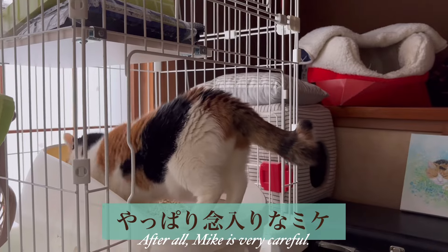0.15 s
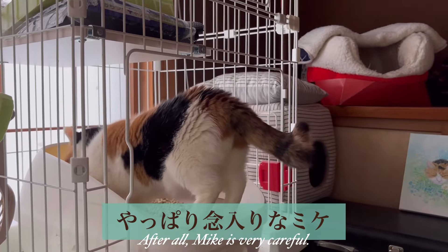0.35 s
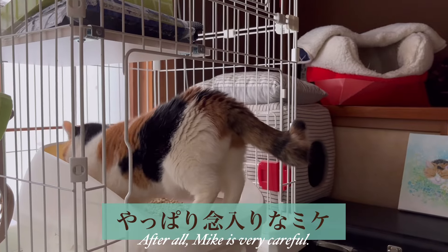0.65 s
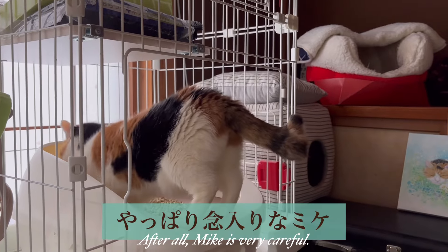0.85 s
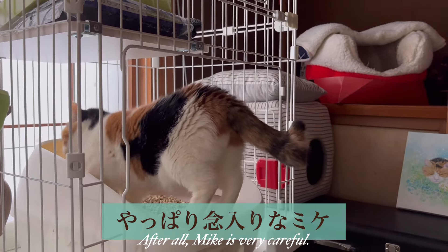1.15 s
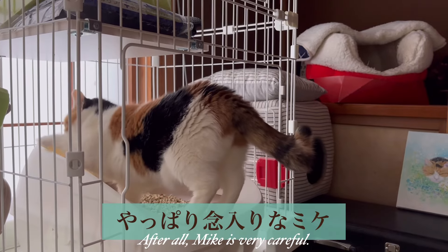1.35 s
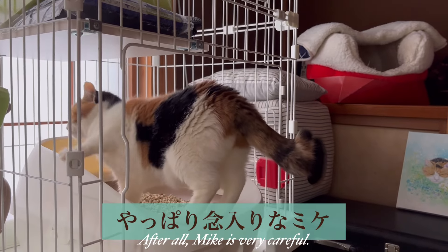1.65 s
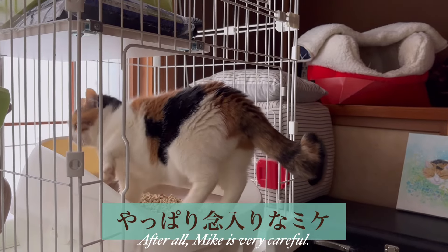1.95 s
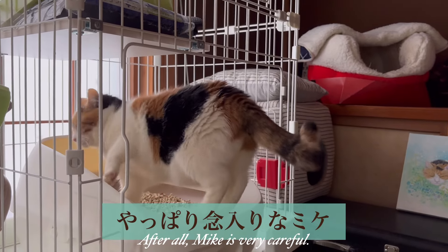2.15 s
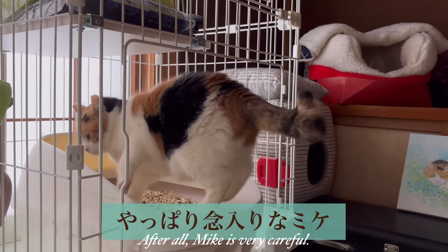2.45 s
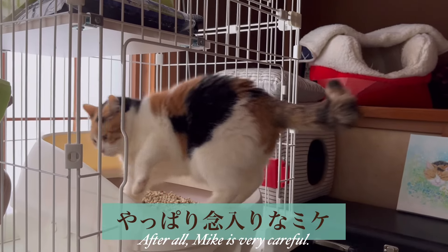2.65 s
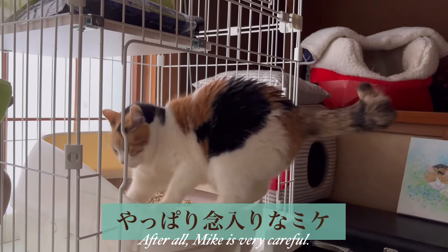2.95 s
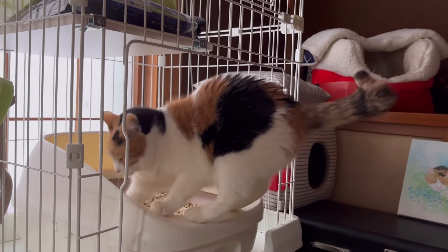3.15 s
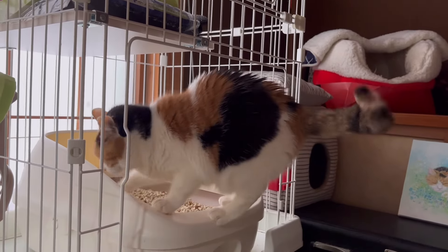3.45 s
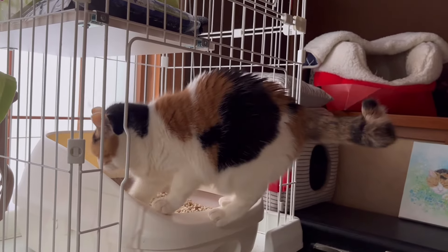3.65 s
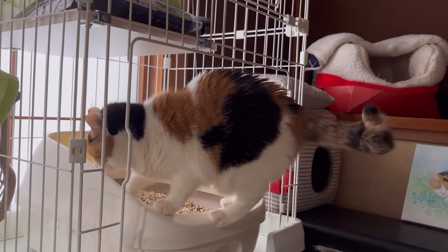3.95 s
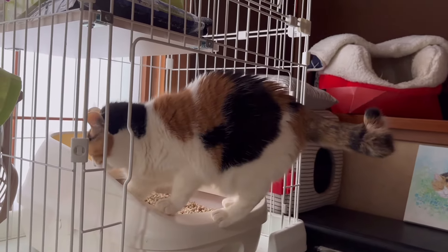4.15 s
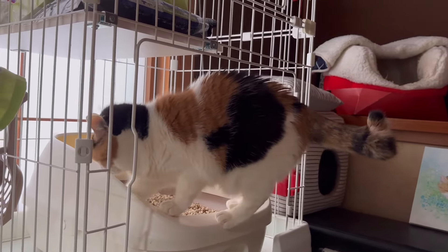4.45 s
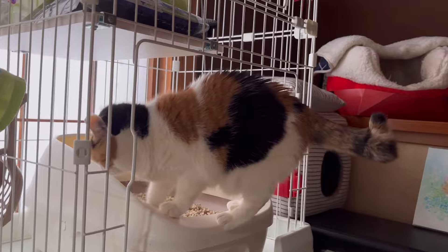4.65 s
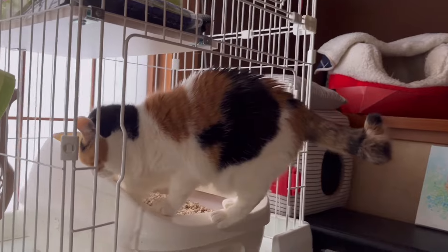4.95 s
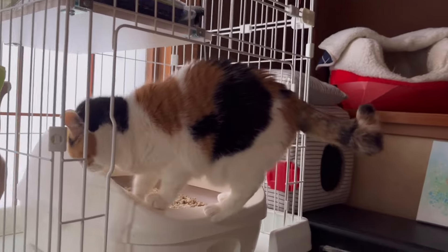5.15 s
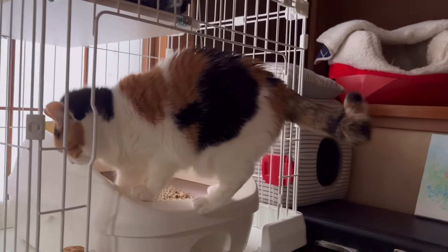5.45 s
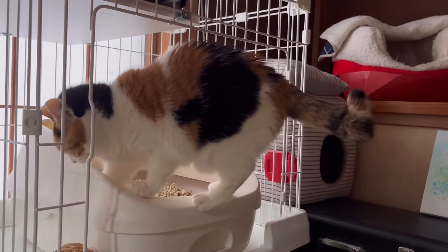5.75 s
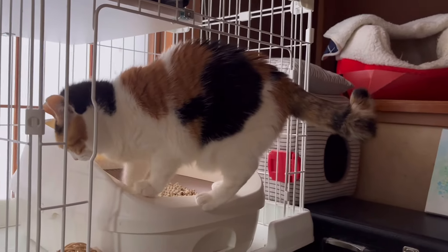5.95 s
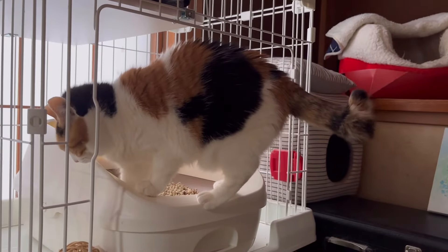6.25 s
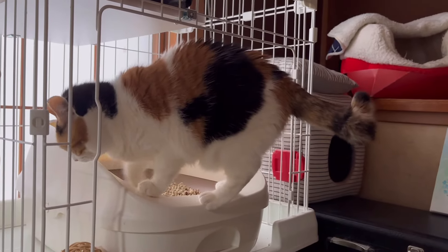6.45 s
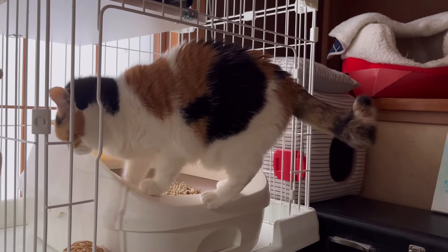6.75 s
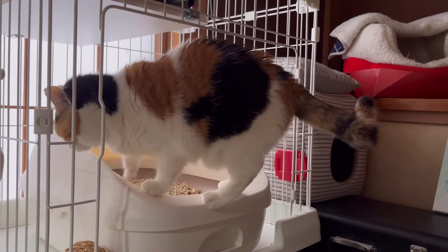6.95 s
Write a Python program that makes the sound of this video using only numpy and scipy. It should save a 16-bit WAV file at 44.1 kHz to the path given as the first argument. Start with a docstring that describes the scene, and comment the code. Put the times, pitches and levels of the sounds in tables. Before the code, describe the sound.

A close, slightly left-leaning phone pickup in a small quiet room with faint low rumble and a short tail. From about 0.1 to 0.5 seconds a cat's paw drags heavily through hard litter pellets: a dense dry rattle, fine crackle and hollow plastic drumming with claw knocks. A second long stroke runs from 0.75 to 1.15. At 1.4 a very soft pad wipes smooth plastic for a quarter second, followed by a small tap and dull foot contact near 1.7. Then it is almost silent until 3.5, with only tiny shifts, a light tick around 3.0 and a faint coat brush near 3.35. Quick scoops follow at about 3.6, 4.1, 4.5, 4.9, 5.3, 5.7, 6.15 and 6.6, each a short burst of clattering pellets, boxy thump and sharp clicks, with little high fur hisses between. The last pellets settle by 7.0, leaving room rumble.

```python
"""Cat raking its litter box

Pellets rattle in a plastic box: two long strokes, a pause with a wiped wall, then a run of quick strokes.
Each stroke is a shower of tiny random collisions; pressing deeper drums the hollow tray.
Claws and single pellets knock as short noise bursts, soft feet ring one dull note of the tray,
and paw, coat and fur hiss as coloured noise. A small room adds a short tail and a low rumble,
and a phone's two channels share their treble.
"""
import sys
import numpy as np
from scipy import signal
from scipy.fft import rfft, irfft, next_fast_len
from scipy.io import wavfile
from scipy.ndimage import uniform_filter1d

SR = 44100
rng = np.random.default_rng(int(sys.argv[2]) if len(sys.argv) > 2 else 0)


def digitize_waveform(pressure):
    """Quantize a signal to 16-bit integers and store it at the path in sys.argv[1].

    Rows of a 2-D input are taken as channels; values are limited to [-1, 1].
    """
    field = np.atleast_2d(pressure).T
    bounded = np.clip(field, -1, 1)
    quanta = np.round(bounded * 32767).astype(np.int16)
    wavfile.write(sys.argv[1], SR, quanta)


N = 313545

# All table levels are relative: mixing, and scaling each spectrum to power 1, come later.
# claws and single pellets knocking on the box: t/s, clatter level/dB,
# tray drumming above it/dB, fine crackle above it/dB, decay/s
CLAW_KNOCKS = [(0.008, -63, 3.5, -5.5, 0.012), (0.037, -63, 11.5, -13, 0.002),
               (0.091, -35, -6.5, -4.5, 0.016), (0.1611, -45.5, -16, 3.5, 0.0087),
               (0.18, -39, -18, -8, 0.0062), (0.3302, -47, -16.5, 3, 0.0019),
               (0.353, -35.5, 7, -30, 0.0042), (0.5596, -56, -11, -16, 0.0033),
               (0.677, -58.5, -19, -6, 0.0013), (0.7251, -41.5, -20, -13, 0.0033),
               (0.792, -49, -20, 0, 0.00087), (0.878, -53, -14, 9, 0.003), (0.9352, -43.5, 1, -19, .0014),
               (0.9595, -46, -8, -17, 0.0026), (1.009, -43.5, -15, -32, 0.00047),
               (1.0346, -47, -21, -23, 0.0012), (1.0707, -45, -14, -7, 0.00075),
               (1.1058, -51.5, -13, -21, 0.0011), (1.157, -58, 12.5, -11, 0.0042),
               (1.2128, -64, -4, -27, 0.0027), (1.314, -62, 3.5, -48, 0.00098),
               (1.648, -56, 0.5, -23, 0.0022), (1.695, -66.5, 12.5, -24, 0.0022),
               (1.7297, -49.5, -11, -8.5, 0.0021), (1.929, -81, 14, -4, 0.0011),
               (2.801, -63.5, 7.5, -15, 0.0015), (2.851, -84, 19, -17, .002),
               (2.985, -53.5, -2.5, -1, 0.0023), (3.007, -65, 6, -16, 0.0024), (3.0464, -70, 2, -5, 0.002),
               (3.06, -73, 11, -11, .0015), (3.092, -74, 16.5, -30, 0.0016), (3.131, -86, 21, -28, .002),
               (3.535, -54.5, 10, -12, 0.0046), (3.556, -58, 6, -18, .002), (3.6133, -48.5, -6, 3, 0.0037),
               (3.6605, -45, -19, 4, 0.013), (3.689, -39.5, -16, -1, 0.017),
               (3.722, -44.5, -25, -5.5, 0.0021), (3.758, -50.5, -13, -7, 0.0022),
               (3.848, -60, -10, -33, 0.004), (3.951, -59.5, -6, -21, 0.0046),
               (3.966, -62.5, -1, -23, 0.0087), (4.066, -38, -1, -12.5, 0.028),
               (4.164, -55, 6, -12, 0.0021), (4.189, -52, -1, 1, .002), (4.2852, -57, 3, -24, 0.0052),
               (4.383, -62, -14, -16, 0.0033), (4.409, -58, -25, -18, 0.0079),
               (4.4611, -38, -8, -8, 0.0059), (4.476, -39, -34, -7, 0.0069),
               (4.563, -42.5, -3, -1.5, 0.0092), (4.605, -46, -39, -19, 0.004),
               (4.6425, -43.5, -28, -6, 0.0029), (4.7413, -50, -6, -13, 0.0057), (4.927, -49, 2, -3, 0.014),
               (4.941, -59, -19, 11.5, 0.0025), (4.9705, -59, -12, 1, 0.0038),
               (4.9982, -55, -3, -20, 0.0024), (5.023, -62, -15, 2, 0.0018),
               (5.04, -52.5, 11.5, -16, 0.0055), (5.1316, -48, -6, -10, 0.0017),
               (5.224, -57.5, -4, -4, 0.0048), (5.317, -35.5, -2.5, -10, 0.0067),
               (5.414, -45, 6.5, -1, 0.0022), (5.478, -48, 3, -10, 0.0031), (5.5181, -48.5, -5, -2, 0.0087),
               (5.563, -49, -5, -7, 0.0044), (5.598, -60, -14, -14, .003), (5.628, -53.5, -19, -20, 0.0022),
               (5.6776, -43, -18, -3.5, 0.0017), (5.7121, -32.5, -8.5, -6.5, 0.0028),
               (5.7456, -36, -9.5, -18, 0.0076), (5.788, -47.5, 7, -20, 0.0057),
               (5.8993, -69, 13, -22.5, .002), (6.0956, -66.5, 11, -4, .002),
               (6.132, -56, -13, -23, 0.0018), (6.1457, -44, -5, -26, 0.0072),
               (6.281, -60, 13, -23, 0.0033), (6.5575, -40, 1.5, -4.5, 0.0047),
               (6.653, -52, -3, -4, 0.0042), (6.676, -60, 2, -25, .003), (6.704, -68, 15, -23, 0.004),
               (6.734, -52, -9, -6, 0.0044), (6.7674, -49, -9, -29, 0.0046), (6.782, -52, 8, -27, 0.006),
               (6.8249, -47.5, 9.5, -17, 0.0036), (6.896, -58.5, 1, -10, 0.0022),
               (7.083, -83, 25, -25, 0.0019)]
# the cat puts its weight on the tray: t/s, level/dB, f/Hz, decay/s
FOOTSTEPS = [(1.656, -34, 325, 0.0027), (1.667, -49, 225, 0.0056), (1.739, -52, 277, 0.0076),
             (2.484, -48.5, 240.5, 0.0093), (2.625, -70, 866, 0.018), (2.667, -73, 840, 0.018),
             (3.636, -47.5, 152, 0.018), (4.081, -53, 174, 0.017), (5.397, -60, 213, 0.096),
             (6.194, -47, 226, 0.021), (6.31, -58, 173, 0.034), (6.75, -51, 117, 0.013)]
# resonances of the tray and its hood: f/Hz (before a small random shift), width/Hz, left minus right/dB,
# then the level/dB (before a random change) at the far wall, by the rim and at the side
BOX_RESONANCES = [(330, 48, -6.5, 14.5, 18, 14.5), (436, 52, 5.5, -1.5, 6, -2.5),
                  (475, 36, -5, -10.5, 9.5, 13.5), (564, 27, -1.5, -6.5, 11, 13.5),
                  (617, 60, 7, 5, -13, -23), (720, 83, -2, 9.5, 6.5, 8.5), (854, 13, 2, -5.5, 3.5, -36),
                  (924, 13, 2, -8.5, -9, 5.5), (1006, 44, 3, -8, 0.5, -4.5), (1276, 86, 0.5, 2.5, 6, 3.5),
                  (1585, 58, 1, -4.5, 2, 6.5), (1843, 34, -9, 3.5, 2.5, -6),
                  (2190, 230, 13.5, -14.5, -10, -11.5), (3072, 57, 9, -20, -2.5, -4.5)]
# spectrum of the tray's drumming at the far wall: f/Hz, level/dB
FAR_DRUM_SPECTRUM = [(60, -27.5), (150, -3), (240, -12), (310, -1.5), (480, 3), (620, 4), (780, -4),
                     (1000, 1), (1500, -12), (4000, -101)]
# spectrum of the tray's drumming by the rim and at the side: f/Hz, level/dB
NEAR_DRUM_SPECTRUM = [(50, -40), (100, -0.5), (160, -1.5), (230, 0.5), (290, -5.5), (500, 0), (780, 0.5),
                      (1050, 0.5), (1500, -11), (4000, -69.5)]
# spectrum of loose pellets clattering: f/Hz, level/dB
CLATTER_SPECTRUM = [(400, -30), (750, -2), (1000, 1), (1400, 0), (1900, 1), (2600, 1), (3600, -0.5),
                    (5250, -4.5), (6000, -11), (7500, -11), (14000, -59.5)]
# spectrum of the fine crackle: f/Hz, level/dB
CRACKLE_SPECTRUM = [(2500, -35.5), (4400, -3), (5600, -6), (6800, 2.5), (8000, 2), (9500, 1.5),
                    (11500, -1.5), (15500, -5.5)]
# spectrum of a hard knock on the plastic: f/Hz, level/dB
TAP_SPECTRUM = [(400, -29), (750, -19), (1100, -1.5), (2000, 1), (3500, 4), (5300, -1.5), (6200, -12),
                (7500, -10.5), (14000, -54.5)]
# spectrum of the rubbing paw: f/Hz, level/dB
RUB_SPECTRUM = [(400, 14), (1200, 17), (2500, 19), (3700, 12), (4500, 10.5), (6000, 8.5), (7500, -3),
                (14000, -22)]
# spectrum of the swishing fur: f/Hz, level/dB
SWISH_SPECTRUM = [(2500, -6), (5000, -10), (8000, 5.5), (12000, 9.5), (15500, 6.5)]
# spectrum of the brushing coat: f/Hz, level/dB
BRUSH_SPECTRUM = [(1500, -13.5), (2050, -22), (2400, -9), (3000, -18), (3850, -4), (4400, 3), (5000, -6),
                  (7000, -20.5), (8600, -11), (12400, -13.5), (15000, -19)]
# spectrum of the quiet room: f/Hz, level/dB
RUMBLE_SPECTRUM = [(20, -52), (30, -31), (38, -18), (52, -4.5), (72, 0), (118, -6), (150, -1.5), (200, -9),
                   (330, -11.5), (480, -22), (800, -33), (1600, -44.5), (4300, -50), (7000, -57.5),
                   (15000, -63.5)]
# phase by which the left channel leads: f/Hz, phase/half turns
LEFT_LEAD = [(0, 0), (1400, .05), (3000, .33), (4000, .1), (5000, .04), (5600, -.15), (6300, 0), (7500, 0),
             (8700, -.5), (9600, -.95), (10500, -1.05), (11200, -1.4), (11900, -2), (13500, -2),
             (14300, -2.5), (15200, -3), (16000, -3)]
# clumps of pellets giving way under a raking paw or a resettling foot: t/s, clatter level/dB,
# tray drumming above it/dB, half length/s
PELLET_SLIDES = [(0.25, -42, 0, 0.015), (0.683, -61.5, 0, 0.026), (0.759, -49, -11.5, 0.016),
                 (0.846, -39, 0, 0.024), (1.395, -64, 6, 0.008), (1.667, -62.5, 13, 0.0047),
                 (1.711, -58, 5, 0.007), (1.745, -80, 3, 0.014), (1.941, -75.5, 10, 0.021),
                 (2.185, -76, 5, 0.025), (2.48, -76, 16, 0.0064), (2.662, -87, 7.5, 0.028),
                 (2.838, -73.5, 10, 0.019), (2.959, -76, 10, 0.016), (3.215, -73, 10.5, 0.028),
                 (3.628, -41, -16, 0.032), (4.126, -41, 3, 0.015), (4.181, -47, -6, 0.0095),
                 (4.427, -70.5, 5, 0.039), (4.508, -38.5, 7.5, 0.0076), (4.568, -42.5, 10.5, 0.0091),
                 (5.145, -45, -19, 0.0048), (5.828, -49.5, 12.5, 0.02), (5.917, -56, 14.5, 0.012),
                 (6.007, -69, 12.5, 0.022), (6.119, -69.5, 14, 0.028), (6.386, -63, 9, 0.076),
                 (6.906, -59.5, -3, 0.011), (6.959, -61, -13, 0.003)]
# fur swishing past the wall as the paw reaches forward again: t/s, level/dB, half length/s
FUR_SWISHES = [(3.324, -64.5, 0.056), (3.41, -68, 0.0025), (3.883, -74, 0.051), (4.36, -66, 0.0078),
               (4.822, -70, 0.021), (5.274, -52, 0.0038), (5.654, -60, 0.018), (6.103, -53, 0.0038),
               (6.118, -56.5, 0.011), (6.444, -66.5, 0.047), (6.914, -62.5, 0.014)]
# coat brushing the hood as the cat turns: t/s, level/dB, half length/s
COAT_BRUSHES = [(2.135, -79.5, 0.067), (2.24, -87.5, 0.27), (3.345, -77.5, 0.066), (3.405, -75, 0.047)]
# paw strokes through the litter: t/s, deepest after/s, half length of the scoop/s, lifts after/s,
# clatter level/dB, drumming of the scoop above it/dB, fine crackle above it/dB,
# clatter settling/dB per s, crackle settling/dB per s
PAW_STROKES = [(0.073, 0.173, 0.074, 0.3, -40.5, 5.5, -6.5, 113, 180),
               (0.733, 0.22, 0.076, 0.32, -43, 6.5, -6, 103, 266),
               (2.985, 0.0106, .01, 0.05, -67.5, 12, -12, 247, 200),
               (3.538, 0.1, 0.077, 0.15, -44.5, 3, -8, 115.5, 148),
               (4.062, 0.04, 0.072, 0.11, -42, 2, -7.5, 155.5, 82),
               (4.459, 0.029, 0.052, 0.12, -40, 1.5, -8, 141, 96),
               (4.918, 0.04, 0.092, 0.11, -43, -6, -12, 158.5, 29),
               (5.324, 0.065, 0.03, 0.099, -42, 8, -6, 150, 108),
               (5.516, 0.027, 0.016, 0.013, -48.5, -16, -4, 50, 86),
               (5.717, 0.12, 0.024, 0.1, -47.5, 6, -9, 123.5, 20),
               (6.141, 0.068, 0.014, 0.077, -43, 8, -7.5, 143, 83),
               (6.561, 0.091, 0.076, 0.099, -45, 6, -6, 89, 58)]
# the cat digs at the far wall, turns to the rim, then works along the side:
# from t/s, until t/s, spot (0 far wall, 1 rim, 2 side)
DIGGING_SPOTS = [(0, .65, 0), (.65, 2.3, 0), (2.3, 4.03, 1), (4.03, 4.44, 1), (4.44, 4.89, 1),
                 (4.89, 5.25, 1), (5.25, 5.66, 2), (5.66, 6.08, 2), (6.08, 6.53, 2), (6.53, 8, 2)]

# a stroke lands, sinks to its deepest point, then eases up as the paw draws back
LANDING_S = 0.016
SHALLOW_CLATTER_DB, SHALLOW_CRACKLE_DB = -3, -3  # at the surface, against the deepest point
EASED_DB, EASED_CRACKLE_DB = -3, -1.5  # as the paw lifts, against the deepest point
SINKING_DRUM_DB, DRAG_DRUM_DB = -12, 1.5  # drumming outside the scoop: extra at the surface, while dragging
DRUM_SETTLES = 0.81  # share of the clatter's settling rate
CATCH_DB, CATCH_PER_S = 0.2, 60  # the dragged paw catches and slips

# the pellets: dry collisions, pitched clinks, stray pellets flicked against the wall
DRY_DB, CLINK_DB = -2, -7.5
CLINKS_PER_S, CLINK_SPREAD_DB = 600, 3.1
CLINK_LOW_HZ, CLINK_HIGH_HZ = 850, 5500
CLINK_RING_S = 0.0025  # for a clink at 2000 Hz
STRAY_PER_S, STRAY_DB, STRAY_RING_S = 36, -51, 0.008  # rate and level at the strokes' loudest
STRAY_FOLLOWS = 1  # dB the strays fall for each dB of the stroke
EDGE_SIDE_DB = -2  # stereo width of the crackle
HEAP_SHIFT_DB = 2.4  # how much the shifting heap varies the colour of the clatter

# the box: drumming level, and how each resonance changes from reach to reach
TRAY_DB = -4
MODE_SHIFT, MODE_VARIES_DB = 0.014, 1.3  # share of pitch; level

# a soft paw slides over the wall, its hiss brightening
WIPE_S, WIPE_LENGTH_S, WIPE_ATTACK_S, WIPE_RELEASE_S = 1.41, 0.22, 0.037, 0.031
WIPE_DB, WIPE_HISS_DB, WIPE_BRIGHTENS_DB_PER_S = -63.5, -11.5, 37
# a broad band in the hiss of the pads sinks as they slow
WIPE_BAND_HZ, WIPE_BAND_SINKS_HZ_PER_S, WIPE_BAND_WIDTH_HZ, WIPE_BAND_DB = 4200, 5500, 1300, -4

RUMBLE_DB, RUMBLE_WAVER_DB = -58.6, 1.6
SWISH_ROUGH_DB = 2.2  # how grainy the swishes are
MONO_HZ, TOP_HZ = 5900, 15750  # above the first both channels are alike; above the second all is cut

TIME = np.arange(N) / SR
SIZE = next_fast_len(N + SR, True)
FREQ = np.maximum(np.fft.rfftfreq(SIZE, 1 / SR), 1)
LEFT_RIGHT = np.array([[1], [-1]])  # opposite signs for the two sides


def undb(db):
    """Turn decibels into gain."""
    return np.exp(np.asarray(db) * (np.log(10) / 20))


def unit(x):
    """Scale to rms 1."""
    return x / np.sqrt(np.mean(np.abs(x) ** 2))


def colour(points):
    """Filter of power 1 through (Hz, dB) points that never sounds before its input."""
    hz, db = np.transpose(points)
    level_db = np.interp(np.log(FREQ), np.log(hz), db)
    cepstrum = irfft(np.log(undb(level_db)), SIZE)
    # folding the second half onto the first gives minimum phase
    cepstrum[1:SIZE // 2] *= 2
    cepstrum[SIZE // 2 + 1:] = 0
    return unit(np.exp(rfft(cepstrum)))


def through(x, response):
    """Pass a sound through a frequency response."""
    spectrum = rfft(x.astype(np.float32), SIZE)
    return irfft(spectrum * response.astype(np.complex64), SIZE)[..., :N]


def stereo_noise(count, side_db):
    """White noise for two ears, partly alike."""
    mid, side = rng.standard_normal((2, count))
    return unit(mid + undb(side_db) * side * LEFT_RIGHT)


def swell(s, half_s):
    """A smooth rise and fall around a moment."""
    return np.exp(-np.minimum(((TIME - s) / half_s) ** 2, 50) / 2)


def rumble():
    """The quiet house: a low rumble alike on both sides, wavering a little, under a very faint wide hiss."""
    mid, side = through(rng.standard_normal((2, N)), colour(RUMBLE_SPECTRUM))
    side_db = np.interp(np.log(FREQ), np.log([100, 1000]), [-17, -3])
    side = through(side, undb(side_db))
    drift = unit(uniform_filter1d(rng.standard_normal(N), SR // 10))
    waver = undb(RUMBLE_WAVER_DB * drift)
    return undb(RUMBLE_DB) * (mid * waver + side * LEFT_RIGHT)


def knocks(rise_s, rebound_s, rebound_db, side_db, trim_db):
    """Hard contacts, each with a rebound, as bursts of noise that push the clatter, tray and crackle."""
    out = np.zeros((3, 2, N + SR))
    age = np.arange(SR // 25) / SR
    for s, db, drum_db, crackle_db, decay in CLAW_KNOCKS:
        late = age - rebound_s * rng.uniform(.8, 1.2)
        first = np.exp(-age / decay) * (1 - np.exp(-age / rise_s))
        rebound = undb(rebound_db) * (late > 0) * np.exp(-np.abs(late) / decay)
        burst = unit(stereo_noise(len(age), side_db) * (first + rebound)) * undb(db + trim_db)
        start = int(s * SR)
        shares = undb([0, drum_db, crackle_db])[:, None, None]
        out[:, :, start:start + len(age)] += shares * burst
    return out[:, :, :N]


def box(spot):
    """The hollow box rings at every contact; the digging spot decides which resonances answer, with chance."""
    modes = np.array(BOX_RESONANCES)
    shift, louder = rng.standard_normal((len(modes), 2)).T
    hz, width, pan_db = modes.T[:3]
    hz = hz * (1 + MODE_SHIFT * shift)
    ratio = FREQ.astype(np.float32) / hz.astype(np.float32)[:, None]
    sharpness = (hz / width).astype(np.float32)[:, None]
    responses = 1 / (1 + 1j * (ratio - 1 / ratio) * sharpness)
    gains = undb(modes[:, 3 + spot] + MODE_VARIES_DB * louder + pan_db * LEFT_RIGHT / 2)
    return 1 + gains.astype(np.complex64) @ responses


def strokes():
    """Levels in dB of clatter, drumming and crackle as the paw lands, scoops down and lets pellets settle."""
    power = np.full((3, N), 1e-11)
    for (s, deepest_s, scoop_s, lifts_s, db, scoop_db,
         crackle_db, settle, crackle_settle) in PAW_STROKES:
        age = TIME - s
        landed = np.clip(age / LANDING_S, 0, 1)
        shallow = 1 - np.clip(age / deepest_s, 0, 1)
        easing = np.clip((age - deepest_s) / lifts_s * 2, 0, 1)
        eased_db = np.outer([EASED_DB, EASED_DB, EASED_CRACKLE_DB], easing)
        after = np.maximum(age - lifts_s, 0)
        clatter = SHALLOW_CLATTER_DB * shallow - settle * after
        drum = DRAG_DRUM_DB + SINKING_DRUM_DB * shallow - DRUM_SETTLES * settle * after
        crackle = crackle_db + SHALLOW_CRACKLE_DB * shallow - crackle_settle * after
        levels_db = db + eased_db + np.array([clatter, drum, crackle])
        power = power + (landed * undb(levels_db)) ** 2
        scoop = undb(db + scoop_db) * swell(s + deepest_s, scoop_s)
        power[1] += (landed * scoop) ** 2
    grip = rng.standard_normal(N // 100)
    catch = np.interp(TIME * CATCH_PER_S, np.arange(len(grip)), grip)
    return 10 * np.log10(power) + CATCH_DB * catch


def pellets(level_db, rate, crowding, spread_db, ring_s, side_db, count=6):
    """Random collisions in several groups, each with its own brief ring; a harder stroke stirs more."""
    per_s = rate * undb(crowding * (np.maximum(level_db, -70) - level_db.max()))
    age = np.arange(SR // 40) / SR
    out = 0
    for _ in range(count):
        hits = np.flatnonzero(rng.random(N) < per_s / count / SR)
        chance = rng.standard_exponential(N, dtype=np.float32)[hits]
        size = unit(undb(spread_db * np.minimum(chance, 3)))
        sign = np.sign(rng.random(N, dtype=np.float32)[hits] - .5)
        train = np.zeros(N)
        train[hits] = size * sign / np.sqrt(per_s[hits])  # keeps the power even as the rate changes
        ring = stereo_noise(len(age), side_db) * np.exp(-age / ring_s)
        out = out + signal.oaconvolve(train[None], ring, axes=1)[:, :N]
    return unit(out)


def clinks(side_db):
    """Single pellets click together, each at its own pitch; the high ones die sooner."""
    draws = rng.random((int(CLINKS_PER_S * N / SR), 4), dtype=np.float32)
    when, pitch, strength, side = draws.T[:, :, None]
    age = np.arange(SR // 80, dtype=np.float32) / SR
    hz = CLINK_LOW_HZ + (CLINK_HIGH_HZ - CLINK_LOW_HZ) * pitch ** 1.2
    decay = CLINK_RING_S * np.sqrt(2000 / hz)
    size_db = CLINK_SPREAD_DB * np.minimum(-np.log(1 - strength), 3)
    size = undb(size_db) / np.sqrt(decay)
    grains = size * np.exp(-age / decay) * np.sin(2 * np.pi * hz * age)
    places = ((when * N).astype(int) + np.arange(len(age))).ravel()
    lean = undb(side_db) * (2 * side - 1)
    ears = [np.bincount(places, (grains * (1 + ear * lean)).ravel(), N)[:N] for ear in (1, -1)]
    return unit(np.array(ears))


def cavity(x, depth_db, change_hz, count=14):
    """The paw and the shifting heap keep changing which bands of the box respond."""
    pitch = np.log(FREQ / 300) / np.log(6000 / 300) * (count - 1)  # band number, from 300 to 6000 Hz
    moments = np.arange(int(N / SR * 100)) / change_hz
    spectrum, out = rfft(x, SIZE).astype(np.complex64), 0
    for weights in np.eye(count):
        wander = np.interp(TIME, moments, undb(depth_db * rng.standard_normal(len(moments))))
        band = np.interp(pitch, np.arange(count), weights).astype(np.float32)
        out = out + irfft(spectrum * band, SIZE)[:, :N] * wander
    return unit(out)


def edges(shower, level_db):
    """In the treble, pellets slide smoothly over each other and now and then an edge snaps."""
    sliding = stereo_noise(N, side_db=EDGE_SIDE_DB)
    snaps = pellets(level_db, rate=9, crowding=0.13, spread_db=4.5, ring_s=0.0027,
                    side_db=EDGE_SIDE_DB, count=4)
    return unit(shower + undb(-5.5) * sliding + undb(-10.0) * snaps)


def strays(level_db):
    """Stray pellets flicked against the wall, each a short ring, rising and falling with the strokes."""
    hits = pellets(level_db, rate=STRAY_PER_S, crowding=0.3, spread_db=1.5, ring_s=STRAY_RING_S,
                   side_db=-11.0, count=6)
    return hits * undb(STRAY_DB + STRAY_FOLLOWS * (level_db - level_db.max()))


def shuffles(stir, press):
    """Clumps of pellets give way, adding power to the clatter and to the tray's drumming."""
    for s, db, heavy_db, half_s in PELLET_SLIDES:
        slide = undb(db) * swell(s, half_s)
        stir = np.sqrt(stir ** 2 + slide ** 2)
        press = np.sqrt(press ** 2 + (undb(heavy_db) * slide) ** 2)
    return stir, press


def litter():
    """Collisions clatter among the pellets, drum the tray beneath and crackle at their rough edges."""
    level_db, drum_db, crackle_db = strokes()
    stir, press = shuffles(undb(level_db), undb(drum_db))
    grind = undb(crackle_db)
    shower = pellets(level_db, rate=2800, crowding=.36, spread_db=3.0, ring_s=0.0009,
                     side_db=-5.0, count=8)
    shower = cavity(shower, depth_db=HEAP_SHIFT_DB, change_hz=54.3)
    rough = edges(shower, level_db)
    hard = knocks(rise_s=0.00075, rebound_s=0.0039, rebound_db=-8.0, side_db=-9.0, trim_db=-4.0)
    rattle = stir * (undb(DRY_DB) * shower + undb(CLINK_DB) * clinks(side_db=-6.0))
    taps = hard[0] + strays(level_db)
    push = (shower * press + hard[1]).mean(axis=0)  # long waves reach both sides alike
    # rough edges crackle at the same instants as the clatter, but with a sound of their own
    grit = np.sign(rng.standard_normal(N))
    crackle = (rough * grind + hard[2]) * grit
    heard = undb(-6.0) * rfft(crackle, SIZE) * colour(CRACKLE_SPECTRUM)
    loose, plastic = colour(CLATTER_SPECTRUM), colour(TAP_SPECTRUM)
    far_tray, near_tray = colour(FAR_DRUM_SPECTRUM), colour(NEAR_DRUM_SPECTRUM)
    for start, end, spot in DIGGING_SPOTS:
        here = (TIME >= start) & (TIME < end)
        ring = box(spot)
        tray = near_tray if spot else far_tray
        layers = (
            (undb(-2.5) * rattle, loose),
            (undb(-2.0) * taps, plastic),
            (undb(TRAY_DB) * push, tray),
        )
        for x, tone in layers:
            heard += rfft((x * here).astype(np.float32), SIZE) * unit(ring * tone)
    return irfft(heard, SIZE)[:, :N]


def wipe(rough_db):
    """Fur and pads hiss over smooth plastic, catching slightly, with a noise band that sinks in pitch."""
    age = TIME - WIPE_S
    moving_s = np.clip(age, 0, WIPE_LENGTH_S)
    release = np.exp(-np.maximum(age - WIPE_LENGTH_S, 0) / WIPE_RELEASE_S)
    touching = np.clip(age / WIPE_ATTACK_S, 0, 1) * release
    hiss_db = WIPE_HISS_DB + WIPE_BRIGHTENS_DB_PER_S * moving_s
    catch = unit(uniform_filter1d(rng.standard_normal(N), SR // 200))
    friction = stereo_noise(N, side_db=-5.0) * touching * undb(WIPE_DB + rough_db * catch)
    band_hz = WIPE_BAND_HZ - WIPE_BAND_SINKS_HZ_PER_S * moving_s
    grit = uniform_filter1d(rng.standard_normal(N), int(SR / WIPE_BAND_WIDTH_HZ))
    band = unit(grit * np.sin(2 * np.pi * np.cumsum(band_hz) / SR))
    band = band * touching * undb(WIPE_DB + WIPE_BAND_DB)
    rub = through(friction, colour(RUB_SPECTRUM))
    hiss = through(friction * undb(hiss_db), colour(CRACKLE_SPECTRUM))
    return rub + band + hiss


def steps(push_s):
    """A padded foot pushes so softly that it rings just one dull note of the tray."""
    out = np.zeros(N)
    for s, db, hz, decay in FOOTSTEPS:
        age = np.maximum(TIME - s, 0)
        envelope = (1 - np.exp(-age / push_s)) * np.exp(-age / decay)
        out += 2 * undb(db) * envelope * np.sin(2 * np.pi * hz * age)
    return out


def brushes():
    """The coat slides along the hood with a soft, narrow hiss and an airy top."""
    touch = sum(undb(db) * swell(s, half_s) for s, db, half_s in COAT_BRUSHES)
    return through(stereo_noise(N, side_db=-6.0) * touch, colour(BRUSH_SPECTRUM))


def swishes(rough_db):
    """Fur passing the wall makes brief, very high, slightly grainy hisses."""
    touch = sum(undb(db) * swell(s, half_s) for s, db, half_s in FUR_SWISHES)
    grain = unit(uniform_filter1d(rng.standard_normal(N), SR // 300))
    catch = unit(undb(rough_db * grain))
    return through(stereo_noise(N, side_db=-4) * touch * catch, colour(SWISH_SPECTRUM))


def room(x, wet_db, t60_low, t60_high, split_hz, first_s):
    """Near walls and furniture return a short diffuse tail, the treble dying first."""
    age = np.arange(SR // 2) / SR
    noise = stereo_noise(len(age), side_db=-3.5)
    low = signal.sosfilt(signal.butter(2, split_hz, fs=SR, output="sos"), noise)
    high = signal.sosfilt(signal.butter(2, split_hz, "high", fs=SR, output="sos"), noise)
    # 1000 times weaker (60 dB) after each t60, in seconds
    tail = low * 1000 ** (-age / t60_low) - high * 1000 ** (-age / t60_high)
    tail = tail * (age > first_s)
    return x + undb(wet_db) * through(x, rfft(unit(tail) / np.sqrt(len(age)), SIZE))


def scene():
    """Add up the cat's sounds, a little to the left, in the room over its rumble."""
    left_db = 1.33
    cat = litter() + wipe(rough_db=2.5) + swishes(SWISH_ROUGH_DB) + brushes() + steps(push_s=0.0034)
    cat = cat * undb([[left_db], [-left_db]])
    heard = room(cat, wet_db=-8.0, t60_low=0.35, t60_high=0.16, split_hz=3260, first_s=0.00517)
    return heard + rumble()


def record(dry):
    """The phone feeds both channels the left treble, turns the phase between them and cuts the top."""
    spectrum = rfft(dry, SIZE)
    shared = 1 / (1 + (MONO_HZ / FREQ) ** 48)
    spectrum = spectrum * np.sqrt(1 - shared) + spectrum[0] * np.sqrt(shared) * undb(1.0)
    hz, half_turns = np.transpose(LEFT_LEAD)
    spectrum[0] *= np.exp(1j * np.pi * np.interp(FREQ, hz, half_turns))
    top = signal.ellip(12, .2, 70, TOP_HZ, fs=SR, output="sos")
    return signal.sosfilt(top, irfft(spectrum, SIZE)[:, :N])


dry = scene()
out = record(dry)
digitize_waveform(out)
```